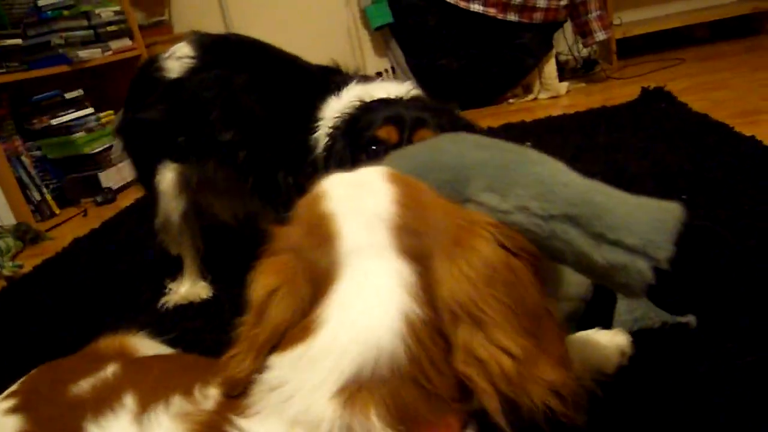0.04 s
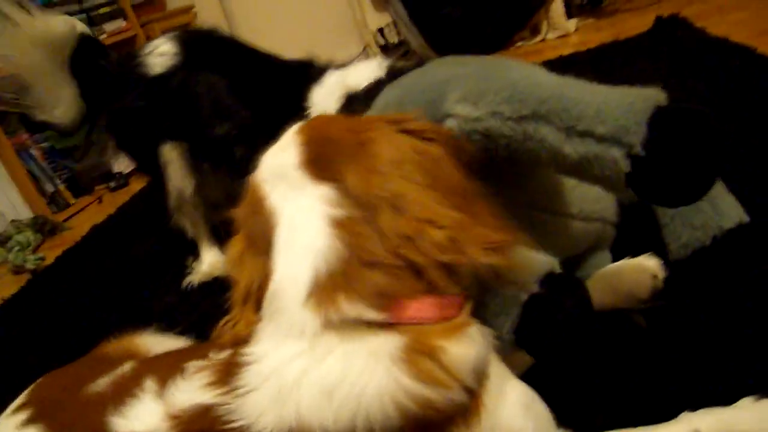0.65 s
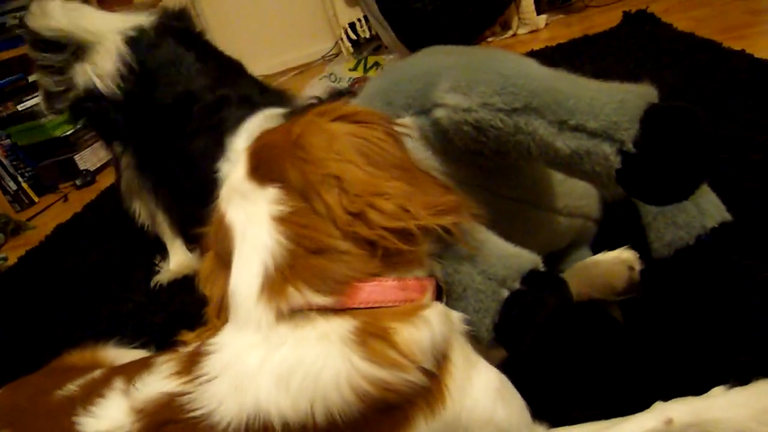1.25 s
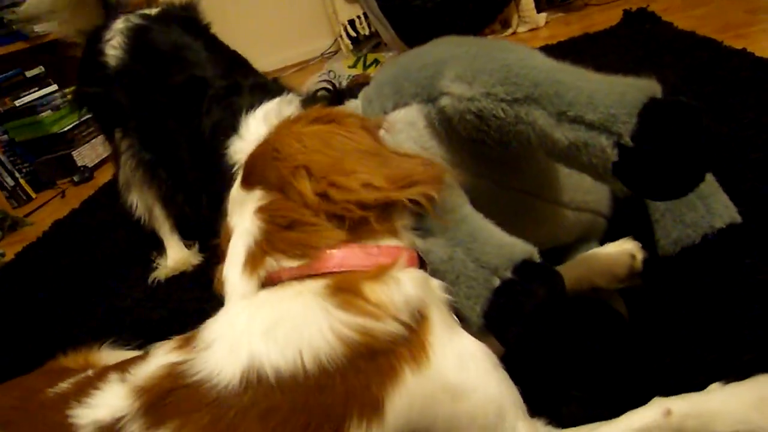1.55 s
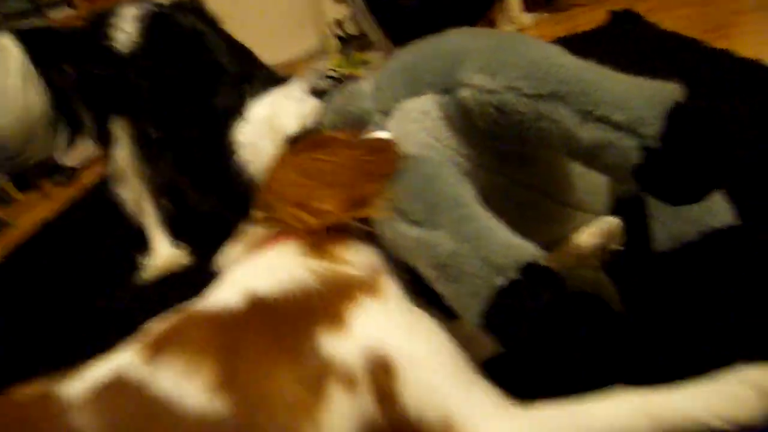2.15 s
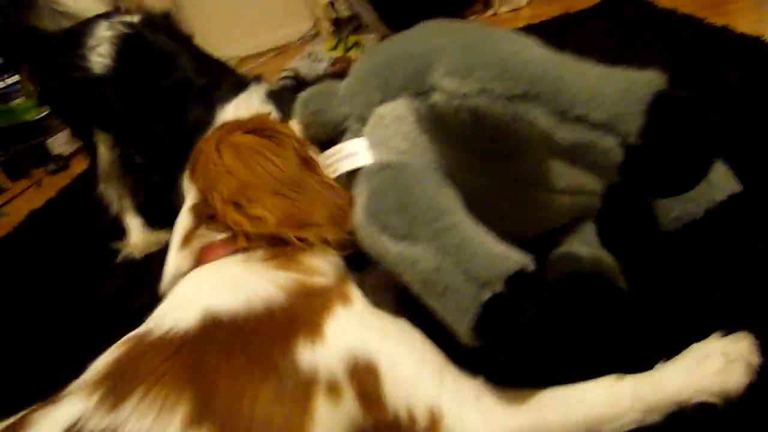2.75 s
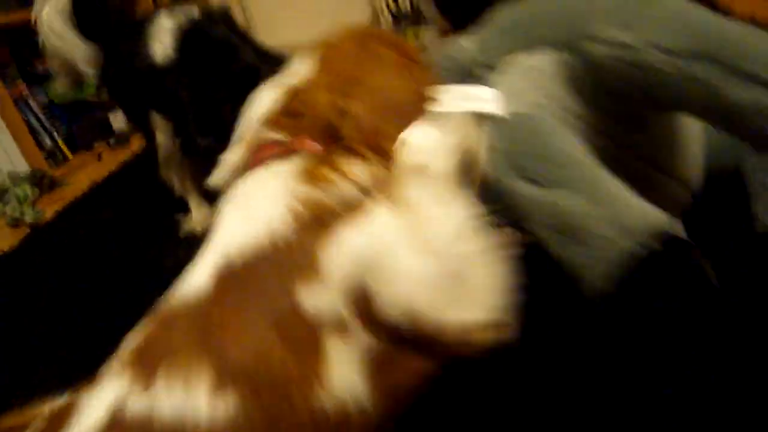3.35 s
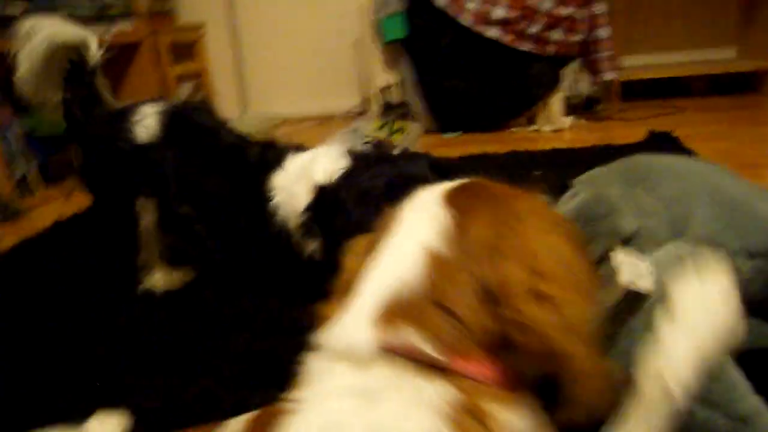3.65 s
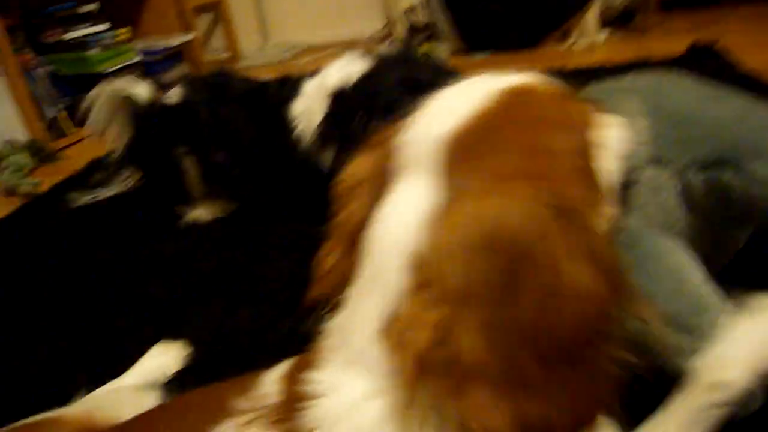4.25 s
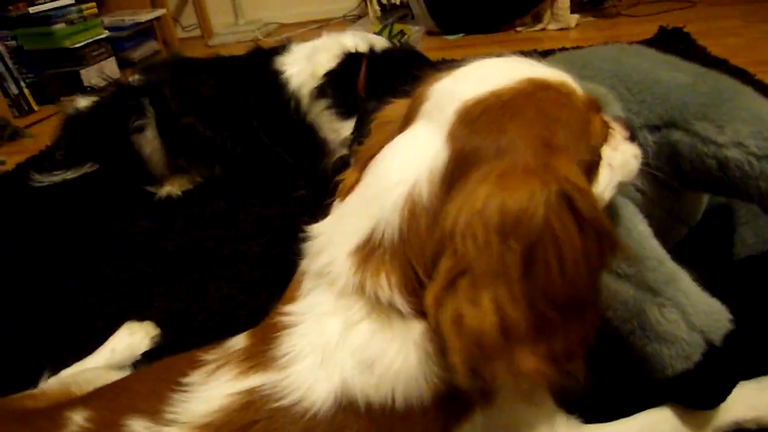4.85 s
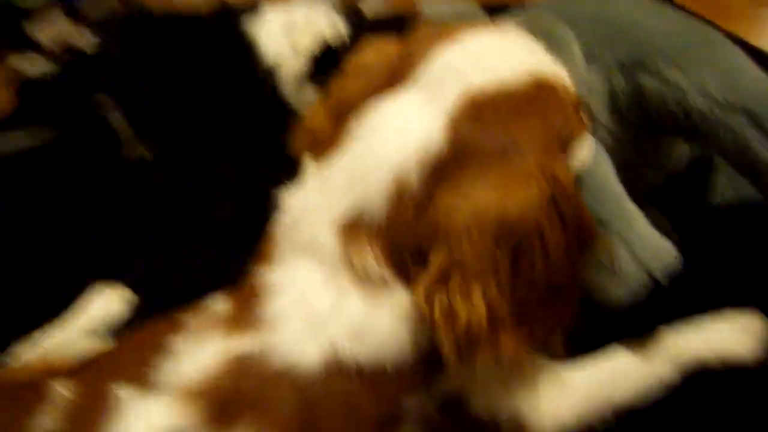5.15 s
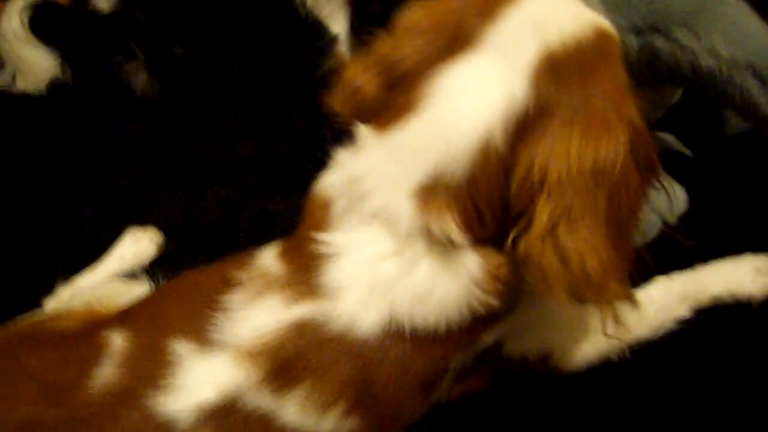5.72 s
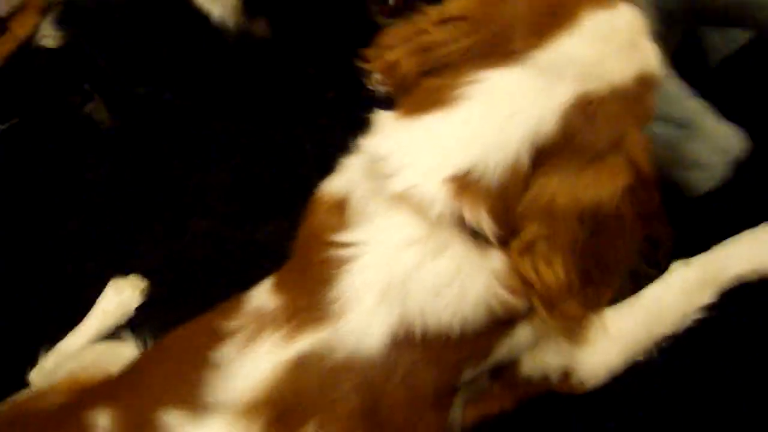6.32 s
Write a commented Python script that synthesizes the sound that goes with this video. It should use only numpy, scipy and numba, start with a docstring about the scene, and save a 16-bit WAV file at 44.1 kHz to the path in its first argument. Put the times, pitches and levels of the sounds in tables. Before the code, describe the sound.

Two dogs tug almost silently at a plush toy on a rug, close to a small hand-held camera. A faint electronic buzz, thin whine, hiss and room rumble run throughout. A sharp knock on the camera's case comes right at the start, then small clicks around 0.6 seconds and faint brushes of fur and fabric until 1.2. The focus motor rasps from 1.7 to 2 seconds, followed by two clicks, a soft thump and a tiny, high metallic ping that repeats twice, fainter. Light clicks fall between 3.1 and 3.4, and soft rustling strokes cluster from 3.3 to 4.4, with a second motor rasp at about 3.8. Brushing returns at 5 seconds. At 5.3 the hardest knock lands with a low thump, and the volume dips momentarily. Smaller clicks follow near 5.7, a third rasp around 6, and a last knock at 6.2.

```python
"""Two dogs tug almost silently at a plush toy on a rug, close to a small hand-held camera.
Fur and fabric brush by; soft knocks and clicks ring the camera's case, and pushes thump it.
The focus motor rasps three times, and after its first run a tiny metal part in the lens pings.
Under it all lie the camera's own buzz, whine and hiss and the rumble of the room.
The hardest knock makes the camera turn its volume down for a moment."""
import sys
import numpy as np
from scipy import signal
from scipy.fft import rfft, irfft
from scipy.io import wavfile
from scipy.ndimage import uniform_filter1d
from numba import njit

SR = 44100
rng = np.random.default_rng(int(sys.argv[2]) if len(sys.argv) > 2 else 0)


def wav_out(sig):
    """Save sig, one row per channel (or a flat mono array), as 16-bit PCM at SR to the path in sys.argv[1]."""
    wavfile.write(sys.argv[1], SR, np.round(np.clip(np.atleast_2d(sig).T, -1, 1) * 32767).astype(np.int16))


N = 290178
TIME = np.arange(N) / SR
FREQ = np.arange(N // 2 + 1) * SR / N + 1e-3  # the tiny offset avoids dividing by zero
TOP_HZ, LENS_RING_HZ = 15900, 11700  # the camera's treble limit; the pitch at which the lens rings


def brushing(grain_db=5, patchy_db=2, split_hz=4200, swish_width_hz=950, swish_db=9, top_hz=13000):
    """Fibres catch and slip in tiny grains that ring the case; faster strokes swish higher and hiss more."""
    # strokes of fur and fabric: start/s, end/s, level/dB, swish f/Hz, right compared with left/dB
    strokes = [(0.39, 0.5, -66, 4600, 5), (0.6, 0.722, -59, 3500, -5), (0.846, 0.86, -54.5, 4300, 7),
               (1.202, 1.228, -52.5, 3900, 0), (3.328, 3.353, -51, 4600, 7.5),
               (3.335, 3.426, -57, 5200, 3.5), (3.466, 3.542, -52, 4400, 0), (3.562, 3.644, -50, 3870, -2),
               (3.811, 3.951, -45, 4250, -2.5), (3.906, 3.946, -45.5, 5200, 2.5),
               (4.142, 4.184, -56, 5300, 0.5), (4.244, 4.368, -55.5, 5230, 3), (5.04, 5.135, -52, 4950, -6),
               (5.155, 5.191, -46.5, 5800, -8), (5.19, 5.342, -49.5, 4200, 0.5),
               (5.325, 5.345, -46.5, 7000, -2), (5.422, 5.562, -55, 5450, 4.5),
               (5.642, 5.686, -51, 4730, -4)]
    usual_swish_hz, usual_hiss_db, hiss_db_per_octave = 4530, -4, 16
    patches = undb(patchy_db * walk(80))
    noise = rng.standard_normal((2, N))
    grain_sizes = undb(grain_db * np.minimum(rng.standard_normal((2, N)), 3.0))
    slips = rfft(noise * grain_sizes) / (1 + (FREQ / top_hz) ** 8)
    left, right = slips[0] * case(0), slips[1] * case(1)
    low = 1 / (1 + (FREQ / split_hz) ** 4)
    body = unit(irfft(left * low, N))
    hiss = unit(irfft(left * (1 - low), N))
    scrape = irfft(right, N)
    out = np.zeros((2, N))
    for start, end, db, hz, right_db in strokes:
        pressure = undb(db) * swell(start, end, edge_s=0.56 * (end - start)) * patches
        hiss_db = usual_hiss_db + hiss_db_per_octave * np.log2(hz / usual_swish_hz)
        swish = signal.lfilter(*signal.iirpeak(hz, hz / swish_width_hz, fs=SR), scrape)
        out[0] += pressure * (body + undb(hiss_db) * hiss)
        out[1] += pressure * undb(right_db) * unit(scrape + undb(swish_db) * swish)
    return out


def clicks(crumble_s=0.0021, crumble_ref_hz=5000, first_contact=0.87, snap_boost_db=3, knock_right_db=-19):
    """Each touch gives a short knock and a snap, sharp at first and then crumbling, that rings the case."""
    # touches: t/s, knock level/dB, knock f/Hz, snap level/dB, snap brightness/Hz, snap right vs left/dB
    touches = [(0.072, -17, 1480, -18, 2100, -8), (0.5425, -27.5, 1100, -27, 3830, 0),
               (0.5869, -33, 1500, -20.5, 14000, 3.5), (0.5972, -29, 663, -23, 2580, 0),
               (1.761, -30, 1000, -23.5, 5100, 5), (2.0362, -22.5, 670, -17.5, 5970, -5),
               (2.06, -27, 580, -24.5, 3900, 1.5), (3.0834, -34, 2200, -28, 10000, -5),
               (3.345, -34, 2100, -34.5, 7000, 11.5), (3.3688, -38, 900, -29, 6000, 3),
               (4.153, -26, 7750, -45, 9000, 0), (5.3083, -2.5, 1110, -22, 6000, -16),
               (5.3118, -15, 800, -38, 2000, -6), (5.3249, -17.5, 10300, -13.5, 10000, -10),
               (5.62, -29, 850, -33, 7000, -19), (5.6762, -21.5, 940, -24, 4000, -13.5),
               (5.682, -29, 2400, -21.5, 11100, -23), (6.2096, -17, 644, -25, 8000, -7)]
    # the body knocks like a small box: multiple of the knock pitch, level/dB
    box_tones = [(0.5, -28), (1, -1), (2.05, -12)]
    # how fast the body stops ringing: f/Hz, time to fade by 60 dB/s
    fade_times = [(650, .022), (850, 0.0041), (1400, 0.0036), (2300, .009), (7700, 0.0034)]
    knocks, snaps = np.zeros(N), np.zeros((2, N))
    age = TIME[:512]
    for start, knock_db, hz, snap_db, bright_hz, right_db in touches:
        fade_s = np.exp(np.interp(np.log(hz), *np.log(fade_times).T))
        for multiple, tone_db in box_tones:
            if multiple * hz < TOP_HZ:
                knocks += undb(knock_db + tone_db) * ring(start, multiple * hz, fade_s / np.sqrt(multiple))
        # a softer touch lasts longer and sounds duller
        crumble = np.exp(-age / crumble_s * np.sqrt(bright_hz / crumble_ref_hz))
        grit = rng.standard_normal((2, len(age))) * crumble
        grit[:, 0] = first_contact
        grit = signal.sosfilt(signal.butter(3, min(bright_hz, TOP_HZ), fs=SR, output="sos"), grit)
        grit *= (SR / 2 / bright_hz) ** (1 / 4) / np.linalg.norm(grit, axis=1, keepdims=True)
        i = int(start * SR)
        snaps[:, i:i + len(age)] += grit * undb(snap_db + snap_boost_db) * stereo(right_db)
    return through(snaps, np.array([case(0), case(1)])) + knocks * stereo(knock_right_db)


def shoves(right_db=-15):
    """A push on the camera swings the air pressure at the microphone down and up once."""
    # soft pushes: t/s, f/Hz, level/dB
    pushes = [(2.066, 121, -34), (3.1, 22.5, -30.5), (5.339, 33, -23)]
    out = 0
    for middle, hz, db in pushes:
        turn = 2 * np.pi * hz * (TIME - middle)
        out = out + undb(db) * turn * np.exp((1 - turn ** 2) / 2)
    return out * stereo(right_db)


def focus_motor(step_hz=140, stutter_db=3.5, step_depth=0.47, right_db=-17):
    """The lens moves in stuttering runs; its gear rasp, pulsed by the motor's steps, rings the barrel."""
    # where the lens barrel rings: f/Hz, width/Hz, level/dB
    barrel_tones = [(850, 280, 0), (1100, 280, -1), (1770, 200, -7), (2200, 160, -15), (11780, 600, -18)]
    step_rate = step_hz * (1 + 0.21 * walk(29.52))
    steps = 1 + step_depth * np.sin(2 * np.pi * np.cumsum(step_rate) / SR)
    rasp = rng.standard_normal((2, N)) * steps * undb(stutter_db * walk(66))
    barrel = sum(undb(db) * resonance(hz, width) ** 2 for hz, width, db in barrel_tones)
    return unit(through(rasp, barrel)) * focus_drive() * stereo(right_db)


def focus_drive(cycle_s=.0495, pause_s=0.0095, pause_db=-6, brake_s=0.019, brake_db=1, edge_s=0.0025):
    """How hard the motor works: moves and pauses take turns, and a last push stops the lens."""
    # runs of the focus motor: start/s, end/s, level/dB
    runs = [(1.726, 2.019, -45.5), (3.763, 4.033, -46), (5.871, 6.134, -46.5)]
    drive = 0
    for start, end, db in runs:
        pausing = (TIME - start) % cycle_s > cycle_s - pause_s
        effort_db = np.where(TIME > end - brake_s, brake_db, pause_db * pausing)
        drive = drive + undb(db + effort_db) * swell(start, end, edge_s)
    return uniform_filter1d(drive, int(edge_s * SR))


def pings(right_db=-14):
    """A tiny metal part in the lens rings as it stops."""
    # taps of the metal part: t/s, level/dB
    taps = [(2.1566, -44.5), (2.299, -55), (2.47, -62)]
    # the tones it rings with: f/Hz, level/dB, time to fade by 60 dB/s
    tones = [(10100, -1.5, 0.049), (LENS_RING_HZ, 0, 0.13)]
    out = sum(undb(db + tone_db) * ring(start, hz, fade_s)
              for start, db in taps for hz, tone_db, fade_s in tones)
    return out * stereo(right_db)


def buzz(hz=54.004, first_s=.00694, spike_db=-43, spike_s=0.00044, load_db=-53, load_s=.0023):
    """The electronics leak into both sides alike: once a cycle, a block of current with a spike on it."""
    from_spike_s = (((TIME - first_s) * hz + .5) % 1 - .5) / hz
    spike = undb(spike_db) * np.exp(-(from_spike_s / spike_s) ** 2)
    load = undb(load_db) / (1 + (from_spike_s / load_s) ** 20)
    return through(spike + load, 1 / (1 + 18 / (1j * FREQ)))  # cut the bass below 18 Hz


def whines(waver_rad=0.48):
    """The camera gives off two thin, steady tones that waver a little."""
    # pitch of each whine: f/Hz
    pitches = [2256, 13393]
    # strength of each whine: left level/dB, right level/dB
    levels = [(-68.5, -106.5), (-103, -79)]
    return sum(np.sqrt(2) * np.sin(2 * np.pi * hz * TIME + waver_rad * walk(3.7)) * undb(dbs)[:, None]
               for hz, dbs in zip(pitches, levels))


def rumble_and_hiss(shared=0.29, shared_below_hz=900):
    """The room rumbles and the microphones hiss; part of the bass is the same on both sides."""
    # room rumble and microphone hiss in each 1 Hz slice: f/Hz, left level/dB, right level/dB
    noise_levels = [(11.8, -65.5, -59), (25, -67, -83), (41.2, -68, -74.5), (87, -79, -75.5),
                    (172, -85, -83), (300, -88.5, -86.5), (543, -90, -91), (740, -83, -90),
                    (1244, -87.5, -94.5), (1390, -93.5, -96.5), (2320, -95, -96.5), (4970, -100, -99),
                    (10300, -102, -103), (15500, -105, -106)]
    # narrow bands of electronic hiss: f/Hz, width/Hz, left level/dB, right level/dB
    hiss_bands = [(2262, 89, -71.5, -104.5), (2810, 130, -89, -94), (LENS_RING_HZ, 830, -73, -90)]
    hz, *sides = np.transpose(noise_levels)
    common = shared / (1 + (FREQ / shared_below_hz) ** 2)
    both = through(rng.standard_normal(N), np.sqrt(common))
    out = np.zeros((2, N))
    for side, db in enumerate(sides):
        noise = both + through(rng.standard_normal(N), np.sqrt(1 - common))
        colour = undb(np.interp(np.log(FREQ), np.log(hz), db)) * np.sqrt(SR / 2)
        out[side] = through(noise, colour)
    for band_hz, width, left_db, right_db in hiss_bands:
        band = unit(through(rng.standard_normal(N), resonance(band_hz, width) ** 2))
        out += band * undb([[left_db], [right_db]])
    return out


def case(side):
    """How the camera's case colours sound at the left (0) or right (1) microphone."""
    # where the case rings: f/Hz, width/Hz, left level/dB, right level/dB
    case_tones = [(783, 500, 4, -20), (1304, 230, 3.5, -38), (2110, 890, 3.5, 4), (2820, 380, -1, -3.5),
                  (3560, 230, -16, 6), (4105, 610, -1, 7), (4740, 380, -18, -1), (5360, 940, -10.5, -38),
                  (7930, 3600, 1, -32), (10100, 530, -7.5, -42), (15000, 730, -48, -23)]
    return sum(undb(dbs[side]) * resonance(hz, width) for hz, width, *dbs in case_tones)


def resonance(hz, width_hz):
    """The filter curve of something that likes to ring at one pitch."""
    return 1 / (1 + 1j * (FREQ ** 2 - hz ** 2) / (FREQ * width_hz))


def ring(start, hz, fade_s):
    """A struck tone that dies away by 60 dB in fade_s seconds."""
    age = np.maximum(TIME - start, 0)
    live = (age > 0) & (age < 2 * fade_s)
    out = np.zeros(N)
    out[live] = np.sin(2 * np.pi * hz * age[live]) * np.exp(-np.log(1000) * age[live] / fade_s)
    return out


def swell(start, end, edge_s):
    """Fade in around start and out around end, each over edge_s seconds."""
    return np.clip(np.minimum(TIME - start, end - TIME) / edge_s + .5, 0, 1)


def walk(rate):
    """A smooth random wobble of size 1 that changes about rate times a second."""
    return unit(through(rng.standard_normal(N), np.exp(-(FREQ / rate) ** 2)))


def through(x, curve):
    """Filter a sound: multiply each frequency by the curve."""
    return irfft(rfft(x) * curve, N)


def stereo(right_db):
    """Left and right gains: the left stays as it is, the right changes by right_db."""
    return undb([[0], [right_db]])


def undb(db):
    """Turn decibels into a gain to multiply by."""
    return 10 ** (np.asarray(db) / 20)


def unit(x):
    """Scale to an average strength (rms) of 1."""
    return x / np.sqrt(np.mean(x ** 2))


@njit
def follow(x, attack, release):
    """Track loudness, rising fast and sinking slowly."""
    out, level = np.empty(len(x)), 0.
    for i in range(len(x)):
        level += (x[i] - level) * (attack if x[i] > level else release)
        out[i] = level
    return out


def scene():
    """Everything the two microphones pick up."""
    play = clicks() + brushing() + shoves()
    return play + focus_motor() + pings() + buzz() + whines() + rumble_and_hiss()


def record(dry, threshold_db=-21, attack_s=0.00064, release_s=0.36, reaction_s=0.025):
    """The volume drops just after a hard knock and creeps back; the highest treble is cut off."""
    loudness = follow(np.abs(dry).max(axis=0), 1 / (attack_s * SR), 1 / (release_s * SR))
    delayed = np.interp(TIME - reaction_s, TIME, loudness)
    gain = 1 / np.maximum(1, delayed / undb(threshold_db))
    return signal.sosfilt(signal.ellip(10, .1, 70, TOP_HZ, fs=SR, output="sos"), dry * gain)


dry = scene()
out = record(dry)
wav_out(out)
```